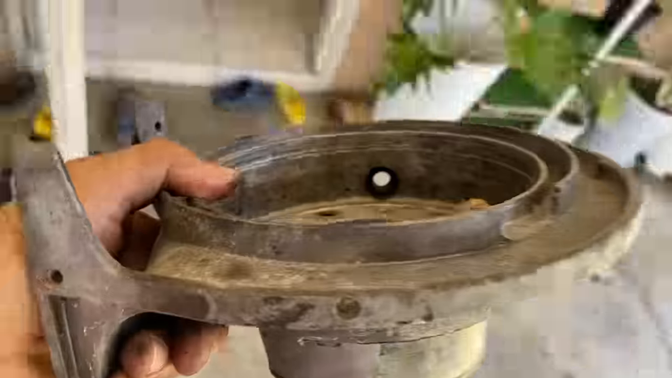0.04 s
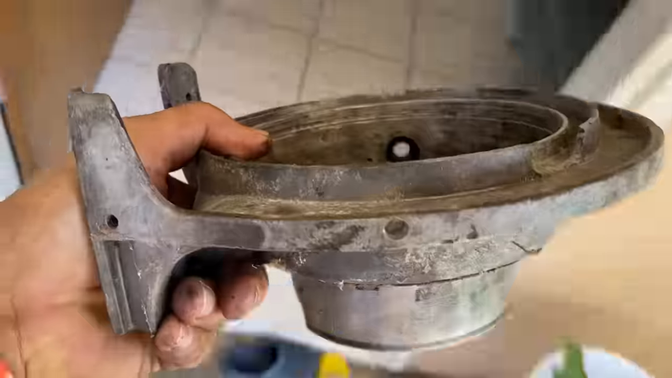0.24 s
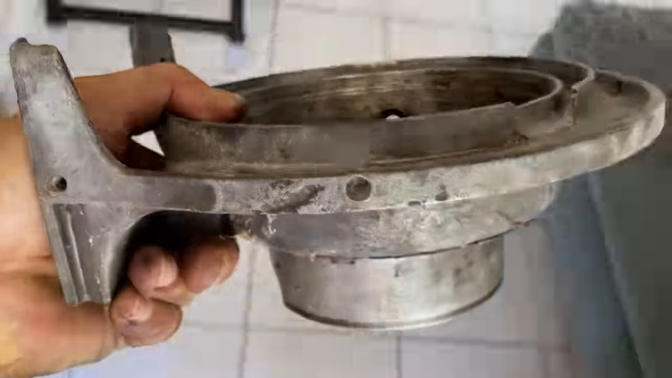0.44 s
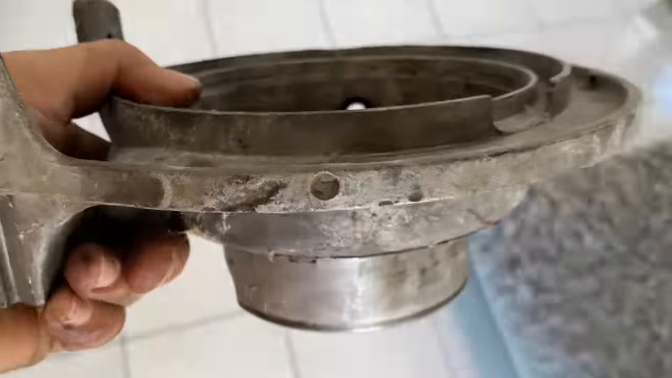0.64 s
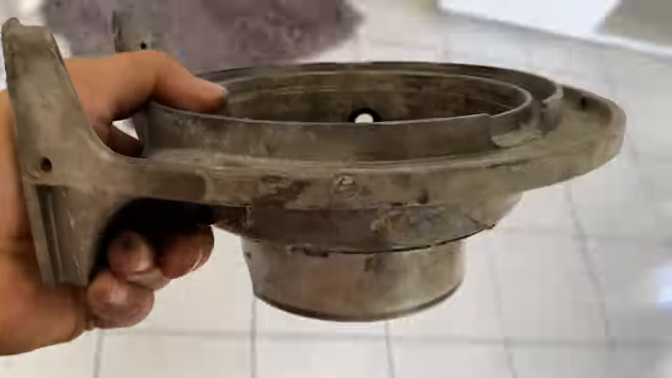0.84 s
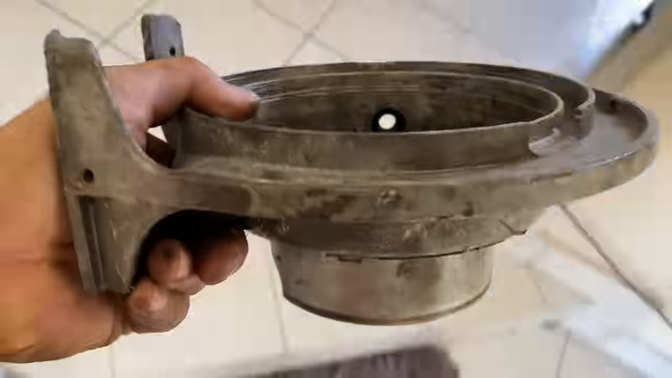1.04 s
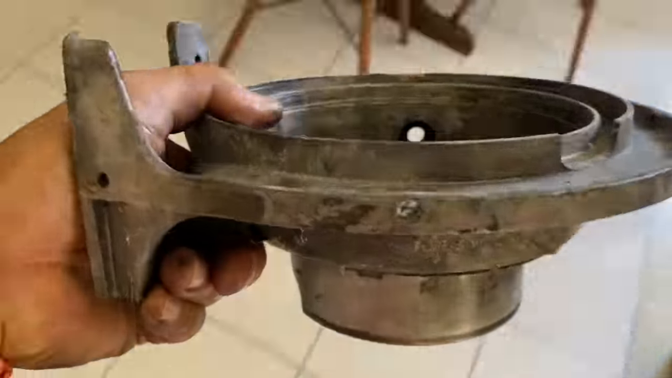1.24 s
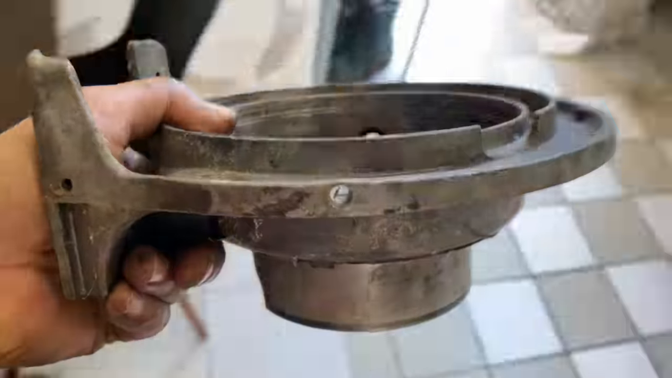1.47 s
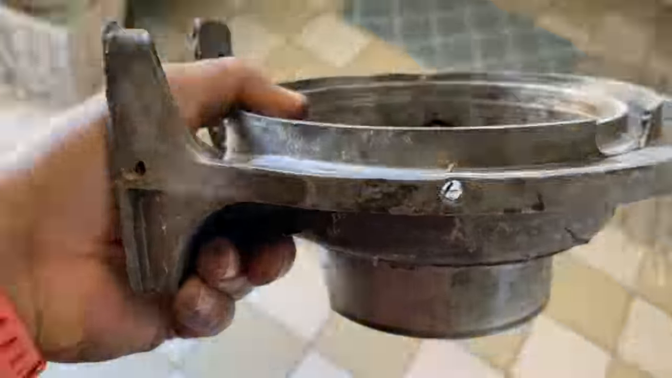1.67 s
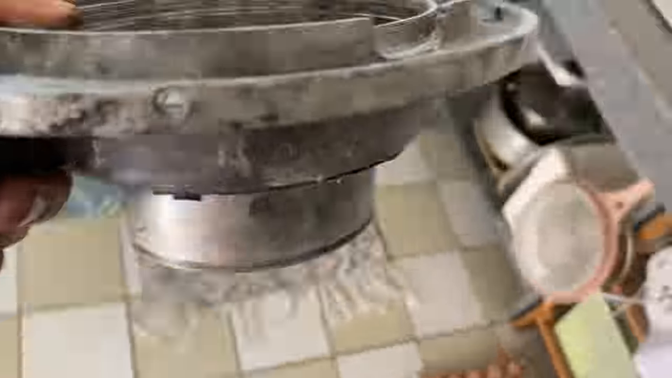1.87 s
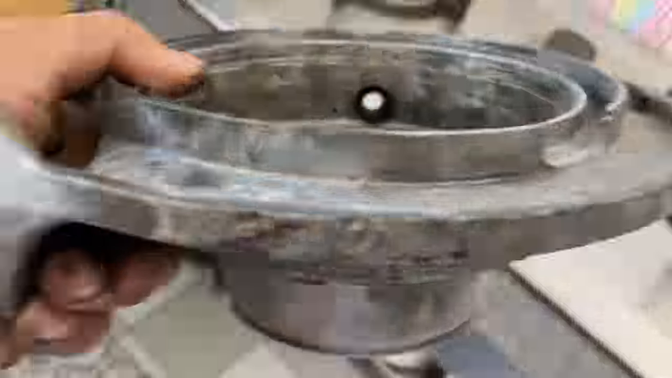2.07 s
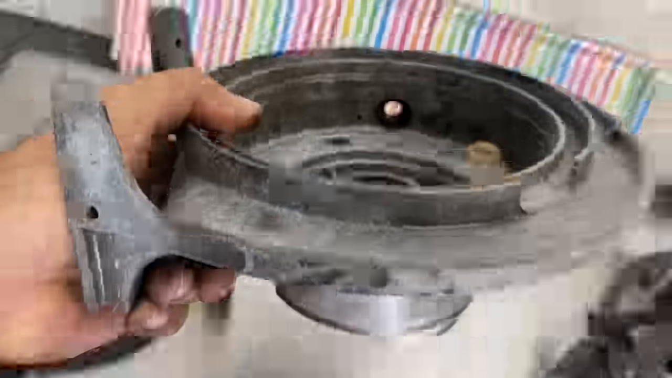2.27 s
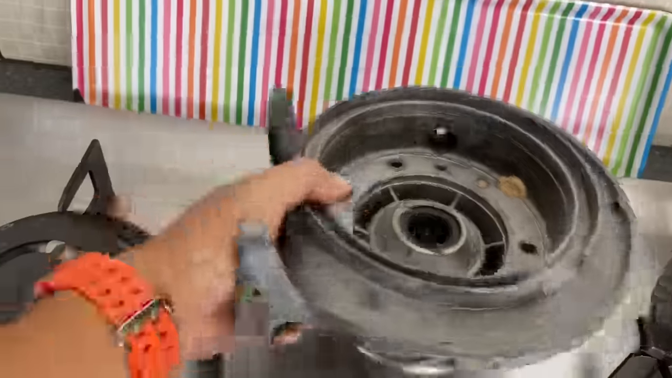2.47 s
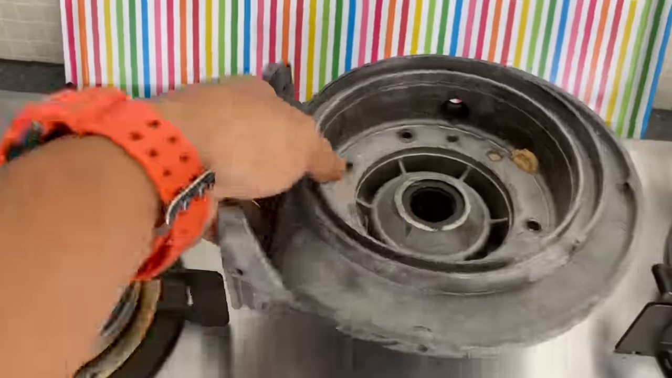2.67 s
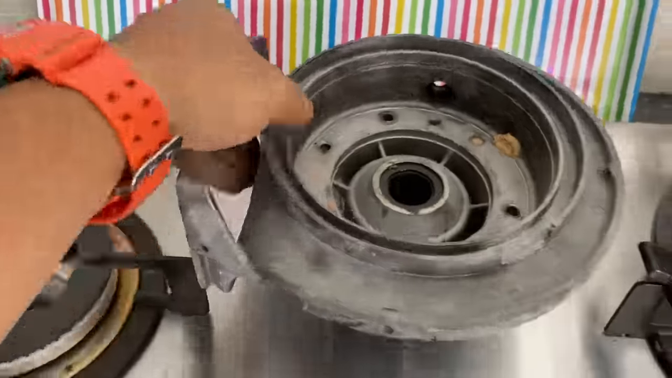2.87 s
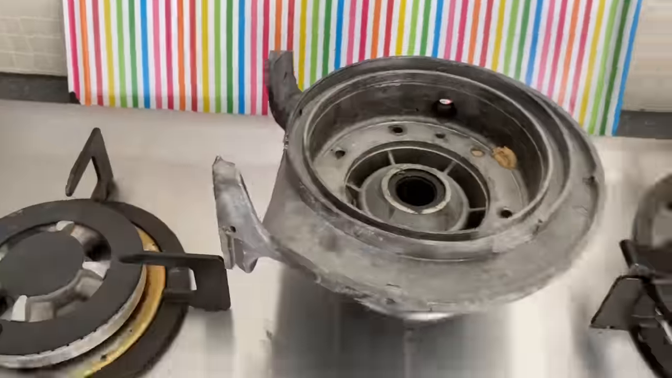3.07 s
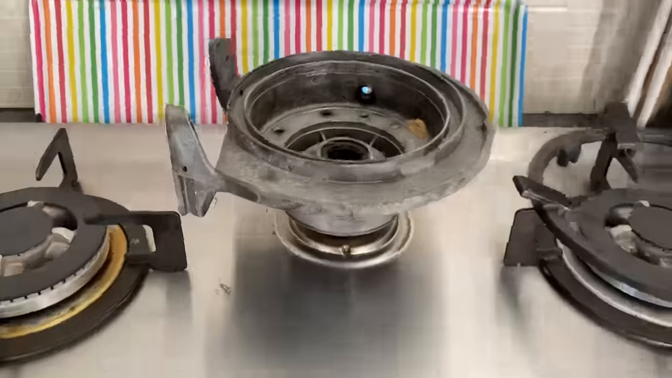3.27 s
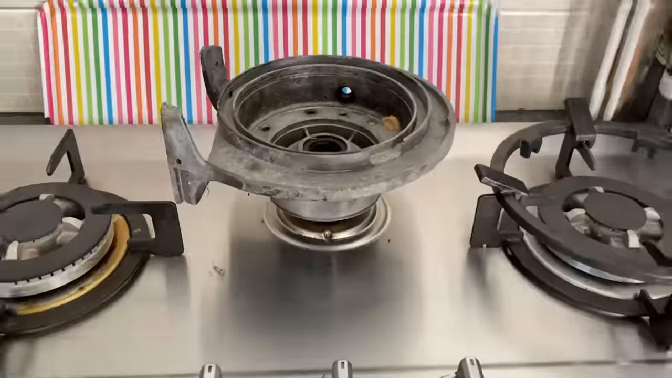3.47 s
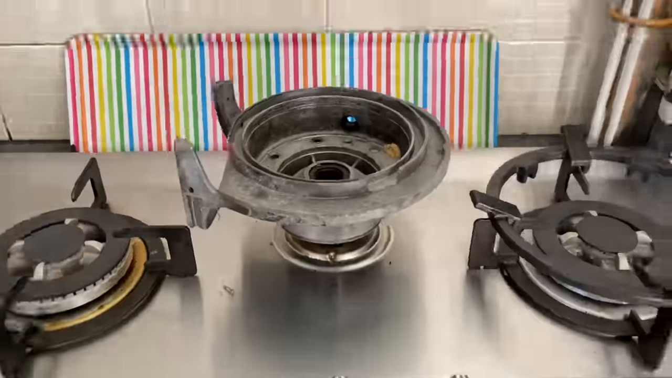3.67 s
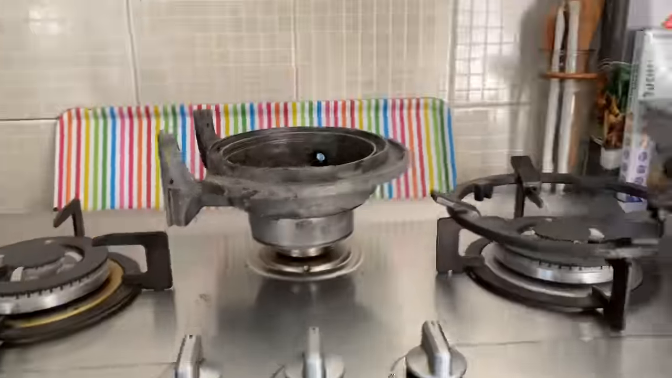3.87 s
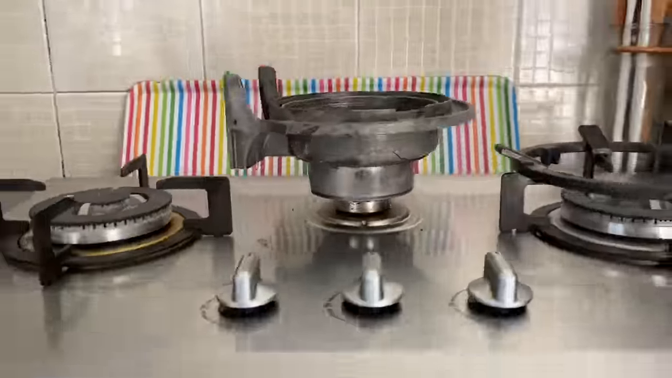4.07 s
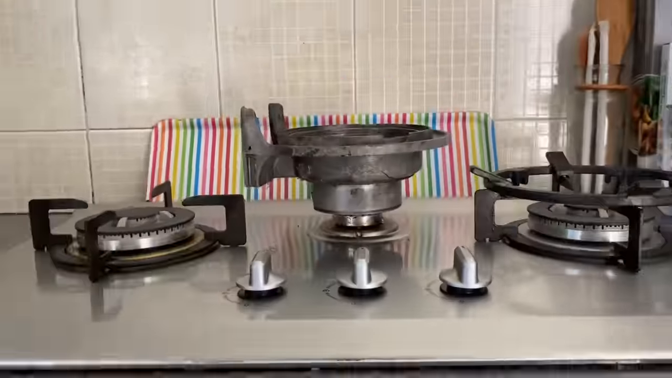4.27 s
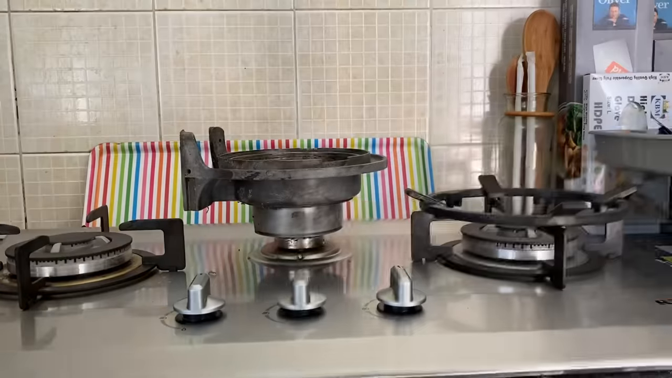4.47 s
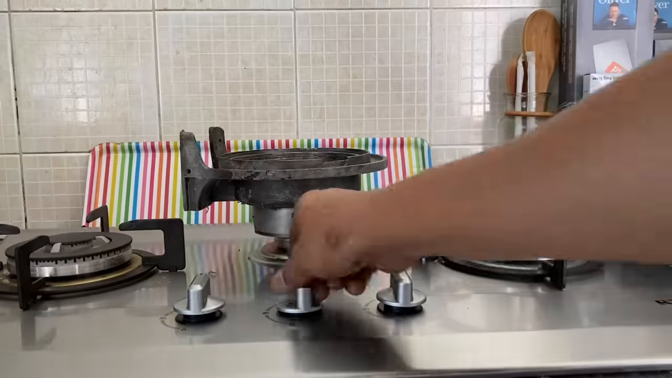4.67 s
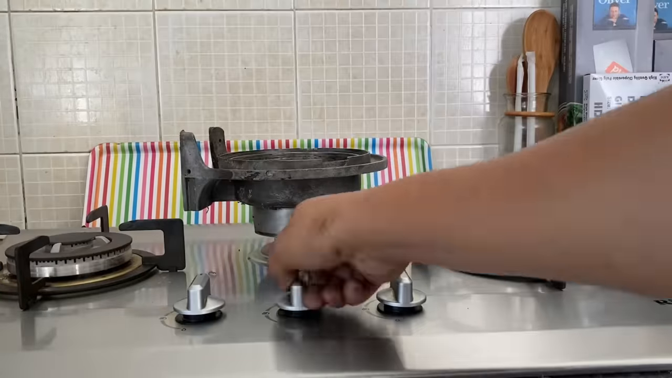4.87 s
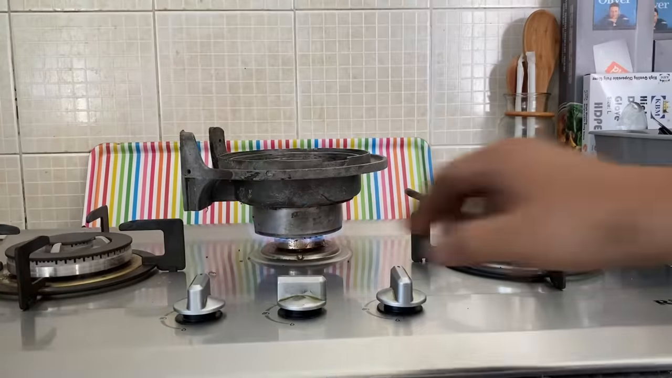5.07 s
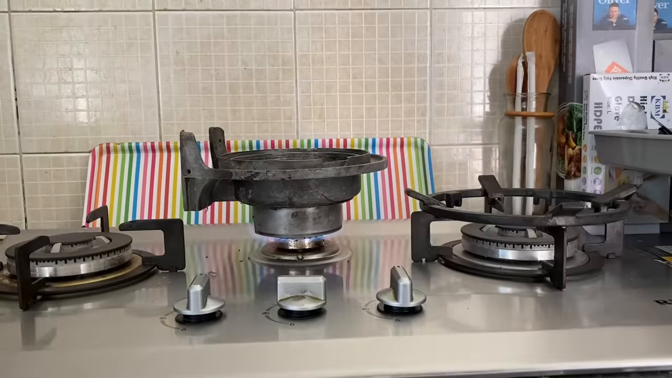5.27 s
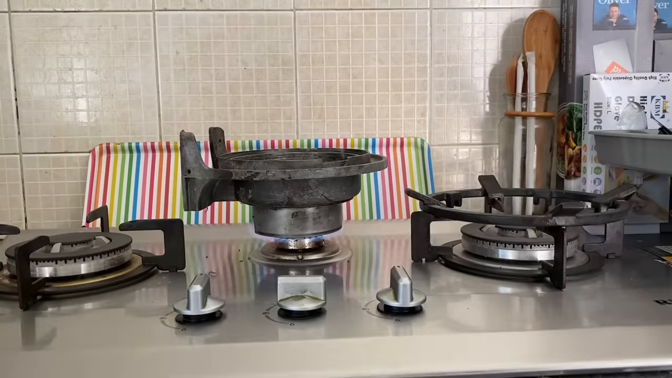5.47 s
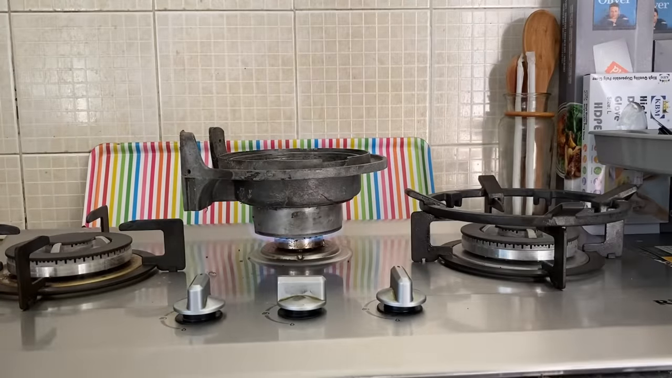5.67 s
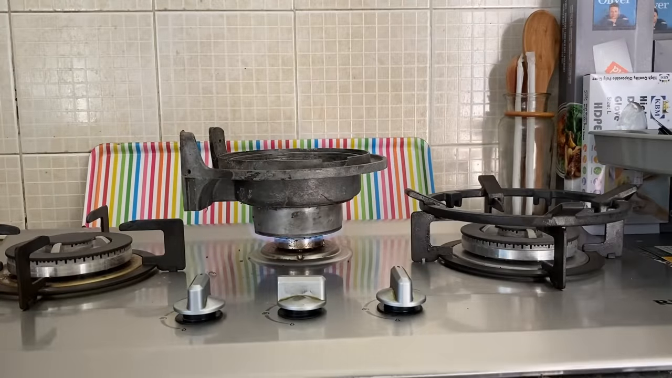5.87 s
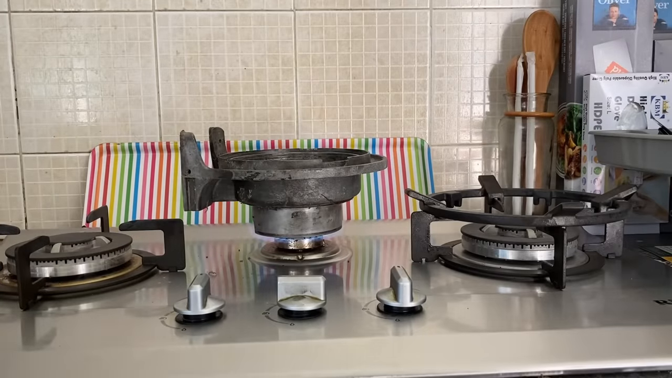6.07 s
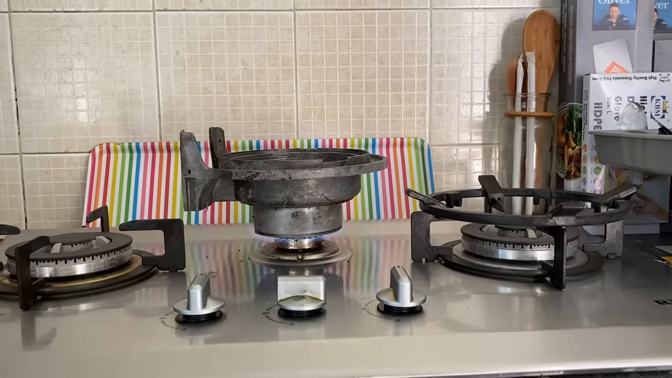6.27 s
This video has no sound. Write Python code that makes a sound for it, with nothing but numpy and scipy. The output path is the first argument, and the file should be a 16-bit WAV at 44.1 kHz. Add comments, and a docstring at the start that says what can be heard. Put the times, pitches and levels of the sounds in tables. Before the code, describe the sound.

Close handheld pickup in a small tiled kitchen: quiet scuffs of feet, cloth and grip over low hum and soft handling rumble. Midway, a heavy cast metal part lands on a steel gas hob with loud clunks, a short scrape and a droning plate, rocking until it settles. After a quiet pause, a knob is pushed and turned with dull clacks and a single igniter snap, then only faint hum and hiss.

```python
"""Feet, cloth and grip scuff faintly over a kitchen hum and a thin whine as someone walks through a tiled home.
A cast metal part then lands and rocks on a steel gas hob: jolted modes, noise cracks and a droning plate.
A knob is pushed and twisted with dull clacks, a short grind and one igniter snap; thumps and pings are dying tones.
The tiles answer the hits with a short noise tail, and the slipping phases of sped-up playback blur every hit."""
import sys
import numpy as np
from scipy import signal
from scipy.fft import rfft, irfft, next_fast_len
from scipy.io import wavfile
from scipy.ndimage import uniform_filter1d, map_coordinates

SR = 44100
rng = np.random.default_rng(int(sys.argv[2]) if len(sys.argv) > 2 else 0)


def dump(signal):
    """Clip the signal to [-1, 1] and save it as 16-bit WAV at the path in sys.argv[1]."""
    limited = np.clip(np.atleast_2d(signal).T, -1, 1)
    pcm = np.round(limited * 32767).astype(np.int16)
    wavfile.write(sys.argv[1], SR, pcm)


def magnitude_from_level(level_db):
    """Linear magnitude for a level in decibels (20 dB per decade)."""
    exponent = np.asarray(level_db, float) / 20
    return 10 ** exponent


N = 278712  # length in samples
RISE_S = 0.001303  # time constant with which a contact builds


def unit(x):
    """Scales a signal to rms 1."""
    return x / np.sqrt(np.mean(x ** 2) + 1e-20)


def along(points, hz):
    """Interpolates (Hz, value) points on a log frequency axis."""
    f, v = np.transpose(points)
    return np.interp(np.log(hz + 1), np.log(f + 1), v)


def wobble(rate_hz):
    """A smooth random curve with rate_hz knots a second."""
    knots = rng.standard_normal(int(N * rate_hz / SR) + 4)
    return map_coordinates(knots, [np.arange(N) * rate_hz / SR])


def filtered(x, response):
    """Passes x through a frequency response scaled to keep white noise at its level."""
    m = next_fast_len(N + SR // 2)
    gain = response(np.fft.rfftfreq(m, 1 / SR))
    gain = gain / np.sqrt(np.mean(np.abs(gain) ** 2))
    return irfft(rfft(x, m) * gain, m)[..., :N]


def colour(spectrum):
    """A smooth frequency response drawn through (Hz, dB) points."""
    return lambda hz: magnitude_from_level(along(spectrum, hz))


def ringing(modes):
    """The response of a body: resonances summed with alternating sign."""
    def response(f):
        total = 0
        for k, (centre, width, db) in enumerate(modes):
            resonance = 1j * f * width / (centre * centre - f * f + 1j * f * width)
            total = total + (-1) ** k * magnitude_from_level(db) * resonance
        return total
    return response


def stereo_noise(spectrum):
    """Coloured noise of rms 1, independent left and right."""
    return unit(filtered(rng.standard_normal((2, N)), colour(spectrum)))


def bursts(times_s, levels_db, t60_s, pitches_hz=None):
    """One dying puff of noise per contact, with a resonance of its own if pitches are given."""
    sharpness_q, tuned_gain = 2.6, 0.8
    x, t = np.zeros(N + SR), np.arange(SR // 5) / SR
    for k, (s, db) in enumerate(zip(times_s, levels_db)):
        puff = rng.standard_normal(len(t))
        if pitches_hz is not None:
            resonator = signal.iirpeak(pitches_hz[k], sharpness_q, SR)
            puff = puff + tuned_gain * unit(signal.lfilter(*resonator, puff))
        x[round(s * SR):][:len(t)] += magnitude_from_level(db - 60 * t / t60_s) * (1 - np.exp(-t / RISE_S)) * puff
    return x[:N]


def tones(rows, rise_s=0.003):
    """One dying sine for each (start_s, level_db, pitch_hz, t60_s) row; t60 is at least 10 ms."""
    x, t = np.zeros(N + SR), np.arange(SR // 5) / SR
    for s, db, hz, t60 in rows:
        envelope = magnitude_from_level(db - 60 * t / max(t60, .01)) * (1 - np.exp(-t / rise_s))
        x[round(s * SR):][:len(t)] -= envelope * np.sin(2 * np.pi * hz * t)
    return x[:N]


def jolts(times_s, levels_db):
    """One single-sample impulse per contact."""
    return np.bincount(np.round(times_s * SR).astype(int), magnitude_from_level(levels_db), N)


def struck(s, mid_db, low_db, high_db, t60_s, body, modes, crack, treble, clank_db, crack_db):
    """Each contact jolts the modes, cracks, pushes the body under it once and sparkles in the treble."""
    ring = filtered(jolts(s + RISE_S, mid_db + clank_db), ringing(modes))
    snap = filtered(bursts(s, mid_db + crack_db, t60_s), colour(crack))
    push = filtered(jolts(s + .0025, low_db), body)
    sparkle = filtered(bursts(s, high_db, t60_s), colour(treble))
    return ring + snap + push + sparkle


# how much the person moves: start_s, rustle_db
MOTION = [(0, -58), (.45, -59.5), (.62, -67), (2.48, -70), (3.05, -67), (3.3, -77.5), (3.7, -75.5),
          (3.9, -66.5), (4.05, -80.5), (4.26, -66), (4.45, -76), (4.6, -68), (4.87, -69.5), (4.93, -61),
          (5.12, -72), (5.95, -74.5), (6.1, -63.5), (6.32, -72)]
STILL_DB = -70  # an ordinary amount of motion


def motion():
    """Rustle level in dB for every sample, following the person's movement."""
    return np.interp(np.arange(N) / SR, *np.transpose(MOTION))


# sway of the hand that holds the microphone: start_s, rumble_db
HANDLING = [(0, -63), (.3, -63), (.4, -51), (.6, -49), (.72, -60), (1, -63.5), (2.4, -63), (2.65, -50),
            (3.6, -63), (4.5, -67.5), (4.87, -56), (5.2, -64), (6.32, -67)]
# rumble spectrum: freq_hz, density_db (relative, per Hz)
RUMBLE = [(20, -5.5), (65, -2.5), (86, -4.5), (130, -21.5), (170, -56.5), (290, -120)]


def handling():
    """Low rumble that swells as the hand on the microphone moves."""
    level_db = np.interp(np.arange(N) / SR, *np.transpose(HANDLING))
    return magnitude_from_level(level_db + 0.63 * wobble(5.0)) * stereo_noise(RUMBLE)


# hum spectrum: freq_hz, density_db (relative, per Hz)
HUM = [(41, -52), (70, -25), (92, -3), (130, -8), (198, -2), (273, -9), (314, -14.5), (498, -18),
       (1500, -36), (1950, -65.5), (3300, -120)]


def room_hum():
    """Low coloured noise that grows on the way into the kitchen and follows the motion a little."""
    hum_db, db_per_motion_db = -57, 0.15
    doorway_db, enter_s = -10.5, 1.14  # loss at the start, gone on entering
    outside = np.clip(1 - np.arange(N) / SR / enter_s, 0, 1)
    level_db = hum_db + db_per_motion_db * (motion() - STILL_DB) + doorway_db * outside
    return magnitude_from_level(level_db + 1.6 * wobble(6)) * stereo_noise(HUM)


# steady tones: pitch_hz, level_db
WHINE = [(2196, -92), (6142, -82)]


def whine():
    """Thin sines that waver in level and phase."""
    t = np.arange(N) / SR
    total = 0
    for hz, db in WHINE:
        level = magnitude_from_level(db + 2.5 * wobble(22))
        total = total + level * np.sin(2 * np.pi * hz * t + 2.5 * wobble(90))
    return total


# hiss spectrum: freq_hz, density_db (relative, per Hz)
HISS = [(470, -21.5), (800, 5), (1110, -11), (2160, -12.5), (6310, -32.5), (9000, -30.5), (11700, -56.5),
        (19800, -120)]


def hiss():
    """Steady microphone noise."""
    return magnitude_from_level(-75) * stereo_noise(HISS)


# cloth body, then treble also used by knob and igniter: freq_hz, density_db (relative, per Hz)
RUSTLE = [(200, -26.5), (350, 3.5), (900, -3.5), (2040, -6.5), (6050, -13), (8000, -26), (10400, -53),
          (17600, -120)]
SPARKLE = [(3000, -63.5), (5000, 0.5), (8500, -2.5), (11500, -5), (13000, -3), (15500, -12.5),
           (16000, -120)]


def clothes():
    """Cloth friction noise in flurries; its treble swish grows faster with motion and at full stride."""
    swish_db, db_per_motion_db = -83, 1.24
    walk_db, walk_from_s, arrive_s, fade_s = 4.5, 0.93, 2.44, 0.073
    t = np.arange(N) / SR
    rustle_db = motion()
    stride = np.clip(np.minimum(t - walk_from_s, arrive_s - t) / fade_s, 0, 1)
    swish_level_db = swish_db + db_per_motion_db * (rustle_db - STILL_DB) + walk_db * stride
    flurry = wobble(22.05)
    rustle = magnitude_from_level(rustle_db + 2.8 * flurry) * stereo_noise(RUSTLE)
    swish = magnitude_from_level(swish_level_db + 1.6 * flurry + 4.2 * wobble(31)) * stereo_noise(SPARKLE)
    return rustle + swish


# scuffs of feet, cloth and grip: start_s, level_db (relative), brightness_db, pitch_hz
SCUFFS = [(0.0395, -55, -7, 1310), (0.1184, -49.5, -12, 1490), (0.2262, -46.5, -12, 1680),
          (0.2902, -45, -8, 1450), (0.3177, -40, -21, 2670), (0.344, -43.5, -18, 3600),
          (0.395, -40.5, -13, 5680), (0.4222, -40.5, -20, 3020), (0.5362, -40.5, -17, 3500),
          (0.7425, -45, -25, 2360), (0.832, -53.5, -12, 3070), (0.908, -54, -29, 3830),
          (0.9289, -49.5, -26, 1850), (1.0197, -50.5, -10.5, 1280), (1.048, -53, -31, 2430),
          (1.1094, -46.5, -22, 2680), (1.2852, -47.5, -15.5, 2860), (1.4388, -42, -22, 2860),
          (1.5844, -63, 5, 1710), (1.6246, -45.5, -36, 1690), (1.6607, -50, -28, 2650),
          (1.6874, -48, -30, 1390), (1.7786, -49.5, -2, 2970), (1.8454, -54.5, -9.5, 1730),
          (1.9821, -47.5, -21, 2590), (2.157, -50.5, -19, 3460), (2.36, -48, -19, 1680),
          (2.384, -53.5, -19, 1690), (3.0898, -58.5, -17, 1740), (3.263, -62.5, -1, 1360),
          (3.5792, -57, -14, 1180), (3.8305, -55, -31, 4770), (4.223, -43, -11.5, 5540),
          (4.256, -48.5, -17, 1300), (4.301, -39, -15, 6600), (4.521, -52.5, -18, 1190),
          (4.63, -55, 3.5, 1640), (6.0537, -44, -23, 1610)]
# scrape, also heard in the drag, then scuff treble: freq_hz, density_db (relative, per Hz)
SCUFF = [(350, -120), (700, 4), (1200, 2), (2500, -0.5), (5000, -0.5), (8000, -6), (11000, -120)]
SHIMMER = [(6500, -30.5), (9200, -3), (12000, -10), (15500, -12.5), (16000, -120)]


def scuffs():
    """Short dry friction puffs, plus random faint ones that follow the motion; their middle range leans left."""
    t60_s = 0.059
    faint_per_s, faint_over_rustle_db, faint_bright_db = 8, 13, -23
    when, size, shine, pitch = rng.random((int(faint_per_s * N / SR), 4)).T
    faint_db = motion()[(when * N).astype(int)] + faint_over_rustle_db - 8 * size
    faint = [when * N / SR, faint_db, faint_bright_db + 12 * (shine - .5), 1300 * 4.5 ** pitch]
    s, level, bright, hz = np.hstack([np.transpose(SCUFFS), faint])
    scrape = filtered(bursts(s, level - 10.5, t60_s, pitches_hz=hz), colour(SCUFF))
    shimmer = filtered(bursts(s, level + bright + 3.5, t60_s), colour(SHIMMER))
    return scrape * magnitude_from_level([[2.2], [-2.2]]) + shimmer


# low thumps of heels, hands and the hob frame: start_s, level_db, pitch_hz
THUMPS = [(0.902, -35, 70), (1, -29, 61.4), (2.534, -17.5, 80.5), (2.583, -15.5, 76), (3.195, -31, 160),
          (3.43, -35, 162), (3.699, -23.5, 92), (4.713, -22.5, 96), (4.989, -23, 95), (5.024, -20, 95),
          (5.052, -22, 308)]
# hollow knocks of a hand or heel: start_s, level_db (relative), pitch_hz
KNOCKS = [(0.385, -38.5, 498), (1.777, -27.5, 465), (3.199, -43.5, 395), (4.501, -39, 482)]
# partials of a knock: pitch_multiple, level_db (relative), t60_s
KNOCK = [(.59, -6.5, 0.06), (1, 3.5, 0.031), (1.95, -6, 0.021), (2.55, -10, 0.033)]
# small pings of metal: start_s, level_db, pitch_hz, t60_s
PINGS = [(.383, -39, 1450, 0.03), (2.649, -12, 2300, 0.012), (2.915, -58, 2734, 0.19),
         (2.961, -39, 4480, 0.029), (3.015, -51, 2030, 0.086), (4.368, -55, 1332, 0.2),
         (5.3, -54, 3380, 0.035), (6.09, -54, 2490, 0.14)]


def bumps():
    """Soft contacts as dying sines: thumps of about three cycles, hollow knocks and pings."""
    thumps = [(s, db, hz, 3 / hz) for s, db, hz in THUMPS]
    knocks = []
    for s, db, hz in KNOCKS:
        knocks += [(s, db + rel, hz * multiple, t60) for multiple, rel, t60 in KNOCK]
    return tones(thumps + knocks + PINGS)


# the igniter snaps: start_s, force_db, brightness_db
SPARK = (4.982, -8.5, -14)
# igniter modes: pitch_hz, width_hz, level_db
IGNITER = [(640, 120, -3), (1030, 90, -4.5), (1230, 100, 0), (1640, 90, -5), (1800, 100, 0), (2124, 90, -4),
           (3150, 110, -11), (4357, 90, -11)]
# hard snap, dull clack and low thud, all shared with the knob: freq_hz, density_db (relative, per Hz)
SNAP = [(600, -120), (1200, -20.5), (2000, 1.5), (3130, -3), (5000, -8), (7000, -14.5), (9100, -39),
        (15400, -120)]
CLACK = [(120, -18.5), (300, -7.5), (520, 3), (680, -6), (1230, -9), (1800, -13.5), (2600, -25.5),
         (4000, -52), (8000, -120)]
THUD = [(18, -38), (30, -24), (97, 2), (268, -9), (319, -27), (400, -21), (520, -27), (880, -120)]
CLACK_T60_S = 0.046


def spark():
    """One hard snap that rings the igniter's own modes."""
    s, force, bright = np.transpose([SPARK])
    dull = filtered(bursts(s, force - 12, CLACK_T60_S), colour(CLACK))
    return dull + struck(s, force, force - 2.5, force + bright, CLACK_T60_S, ringing_body(), IGNITER,
                         SNAP, SPARKLE, clank_db=16, crack_db=-8.0)


def ringing_body():
    """The low thud response of what lies under the knob and igniter."""
    return colour(THUD)


# the knob is touched, pushed and turned: start_s, force_db, hardness_db, brightness_db
KNOB = [(4.658, -46.5, 13.5, -11), (4.704, -30.5, -2, -10), (4.719, -19, -2.5, -18), (4.789, -21, -7, -29),
        (4.818, -33, -2, -33), (4.84, -39.5, 1.5, -28), (4.904, -28, -4, -20.5), (4.921, -28, -10.5, -28),
        (4.945, -27.5, -10.5, -31), (4.967, -46, -6.5, -30), (5.019, -38, 7.5, 2.5),
        (5.044, -19.5, -5, -25.5), (5.073, -42, -13, -41)]
# the knob grinds while it turns: start_s, end_s, level_db
TWIST = (4.9, 4.975, -45)
# valve modes: pitch_hz, width_hz, level_db
VALVE = [(530, 60, 3), (800, 60, -7), (1020, 60, -1), (1360, 80, -0.5), (1680, 64, 2), (2100, 80, -10.5),
         (2910, 90, -7.5)]


def knob():
    """Push and ratchet clacks ring the gas valve; gated, wavering noise makes the dull grind of the turn."""
    s, force, hard, bright = np.transpose(KNOB)
    thud_db = -3 + 0.66 * force  # the thud grows more slowly than the force
    start, end, grind_db = TWIST
    t = np.arange(N) / SR
    turning = (t > start) * (t < end)
    grind_noise = unit(filtered(rng.standard_normal(N), colour(CLACK)))
    grind = magnitude_from_level(grind_db + 2.4 * wobble(60)) * grind_noise * turning
    edge = filtered(bursts(s, force + hard - 8, CLACK_T60_S), colour(SNAP))
    clacks = struck(s, force, thud_db, force + bright, CLACK_T60_S, ringing_body(), VALVE,
                    CLACK, SPARKLE, clank_db=11, crack_db=-3)
    return grind + edge + clacks


# the casting scrapes on the burner while it rocks: start_s, end_s, level_db (relative)
DRAGS = [(2.535, 2.758, -53), (2.868, 3.022, -59)]
# casting modes, also rung by its landing: pitch_hz, width_hz, level_db
CASTING = [(684, 70, -10), (937, 100, -3.5), (1035, 70, -1), (1437, 110, -7.5), (1680, 80, -8),
           (2300, 130, -9), (3230, 120, -17), (3830, 53, -17.5), (4410, 75, -19)]


def drag():
    """Gritty metal-on-metal friction noise, partly through the casting's modes."""
    t = np.arange(N) / SR
    on = sum(magnitude_from_level(db) * (t > start) * (t < end) for start, end, db in DRAGS)
    grit = magnitude_from_level(3.7 * wobble(70)) * rng.standard_normal(N)
    ring = unit(filtered(grit, ringing(CASTING)))
    scrape = unit(filtered(grit, colour(SCUFF)))
    return on * (ring + 0.27 * scrape)


# the casting meets the burner: start_s, force_db, edge_db (how much metal strikes metal, not seating flat)
SET_DOWN = [(2.543, -30, 7.5), (2.592, -18.5, 6.5), (2.631, -43, -1), (2.65, -35.5, -1), (2.66, -24, -4),
            (2.698, -28, 6), (2.735, -37, 4), (2.792, -39.5, -4.5), (2.875, -35, -2), (2.910, -44, 0),
            (2.926, -32, -7.5), (2.959, -45.5, 12), (3.006, -40, -1)]
# the plate drones, pitched by where the casting presses on it: start_s, level_db, pitch_hz
DRONES = [(2.532, -23, 383), (2.582, -11.5, 290), (2.628, -16, 230), (2.658, -18, 248), (2.674, -22, 216),
          (2.699, -20, 305), (2.735, -29, 285), (2.786, -27, 218), (2.873, -25, 270), (2.912, -27, 245),
          (2.926, -19, 220), (3.005, -29, 254)]
# the casting's edge skids briefly on the burner: start_s, level_db
SKIDS = [(2.647, -34.5), (2.699, -47), (2.837, -54), (2.912, -52), (2.963, -52), (2.981, -58)]
# plate modes: pitch_hz, width_hz, level_db
PLATE = [(159, 41, -4.5), (206, 31.6, -1.5), (315, 58, -0.5)]
# crack between the modes, treble of the casting, rasp of a skid: freq_hz, density_db (relative, per Hz)
CLANK = [(180, -7.5), (300, 3), (440, -7), (600, -10), (1040, -19.5), (7000, -43.5), (9100, -78),
         (15400, -120)]
GLINT = [(4500, -120), (6500, -20), (7800, 11), (9500, -1), (11500, -7), (15500, -15), (16000, -120)]
RASP = [(700, -120), (1200, 5), (2500, -9), (3600, -3.5), (4700, -1.5), (5600, -13.5), (8000, -35),
        (12000, -120)]


def casting():
    """The heavy part lands, rocks, skids and settles; the steel plate booms and drones."""
    drone_t60_s, skid_t60_s, clank_t60_s = 0.072, 0.065, 0.055
    s, force, edge = np.transpose(SET_DOWN)
    clank = force + edge
    glint = np.maximum(-21 + 1.59 * clank, force - 38)  # treble grows faster than the clank, above a floor
    drone = tones([row + (drone_t60_s,) for row in DRONES], rise_s=0.006)
    skids = filtered(bursts(*np.transpose(SKIDS), skid_t60_s), colour(RASP))
    hits = struck(s, clank, force + 18, glint, clank_t60_s, ringing(PLATE), CASTING,
                  CLANK, GLINT, clank_db=14, crack_db=0.0)
    return drone + skids + hits


# decay of the tiled kitchen: freq_hz, t60_s
KITCHEN = [(200, 0.11), (2000, 0.1), (10000, 0.03)]


def kitchen(x):
    """The tiled walls answer with a short stereo noise tail, the treble dying first."""
    hz, t, z = signal.stft(rng.standard_normal((2, SR // 2)), SR, nperseg=256)
    decay = magnitude_from_level(-60 * t / along(KITCHEN, hz)[:, None])
    tail = signal.istft(z * decay, SR, nperseg=256)[1]
    return signal.fftconvolve(x[None], tail / np.linalg.norm(tail[0]), axes=1)[:, :N]


def scene():
    """Casting in the middle, knob and igniter slightly left, both echoed by the kitchen, over the background."""
    background = handling() + room_hum() + clothes() + hiss() + whine()
    controls = (knob() + spark()) * magnitude_from_level([[.8], [-.8]])
    hits = casting() + drag() + controls
    return hits + magnitude_from_level(-14.5) * kitchen(hits[0]) + scuffs() + bumps() + background


def sped_up(x, slip_scale_rad, drift_s, size=1024):
    """Speeding up at constant pitch keeps each frequency's strength but slips its phase, per channel."""
    hz, t, z = signal.stft(x, SR, nperseg=size, noverlap=size * 3 // 4)
    drift_frames = max(round(drift_s * SR * 4 / size), 1)
    slip = uniform_filter1d(rng.standard_normal(z.shape), drift_frames, -1)
    slip = unit(uniform_filter1d(slip, size=3, axis=1))  # neighbouring frequencies slip partly together
    depth = slip_scale_rad * hz / (hz + 350) / (1 + hz / 15000)  # bass and treble stay partly in step
    slipped = z * np.exp(1j * depth[:, None] * slip)
    return signal.istft(slipped, SR, nperseg=size, noverlap=size * 3 // 4)[1][:, :N]


def low_pass(x):
    """Removes everything above the highest recorded frequency."""
    return signal.sosfilt(signal.butter(12, 16400, fs=SR, output="sos"), x)


def record(dry):
    """A small microphone drops the deepest bass; then the time squeeze blurs the sound."""
    port = signal.sosfilt(signal.butter(2, 45, "high", fs=SR, output="sos"), dry)
    mix = magnitude_from_level(3.5) * sped_up(port, slip_scale_rad=3.13, drift_s=.3)
    return low_pass(mix)


dry = scene()
out = record(dry)
dump(out)
```